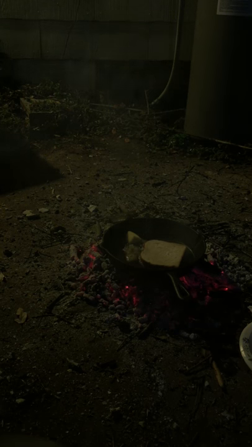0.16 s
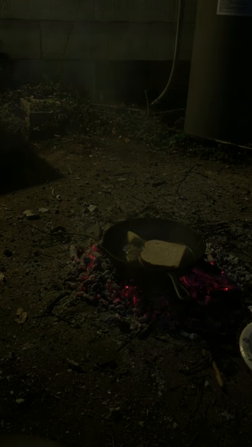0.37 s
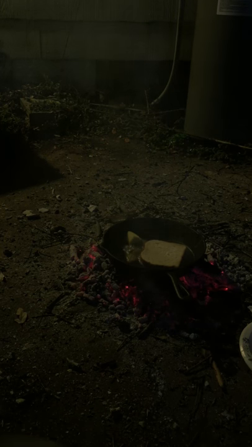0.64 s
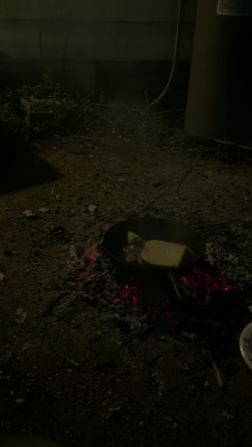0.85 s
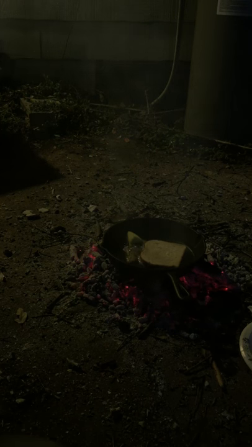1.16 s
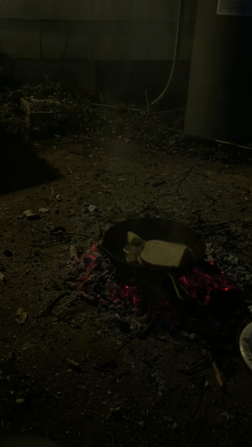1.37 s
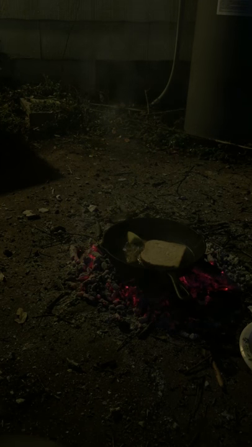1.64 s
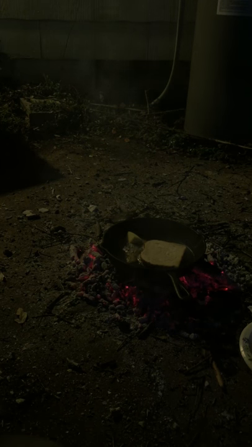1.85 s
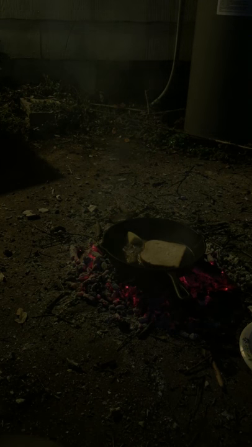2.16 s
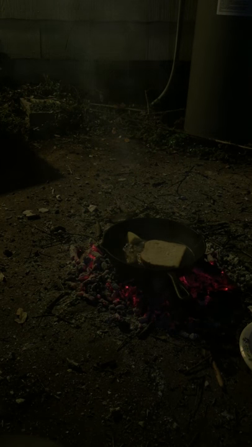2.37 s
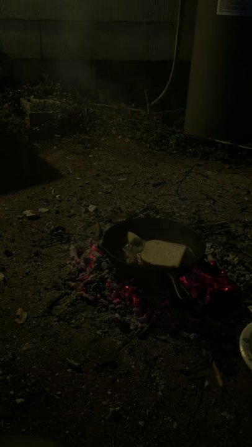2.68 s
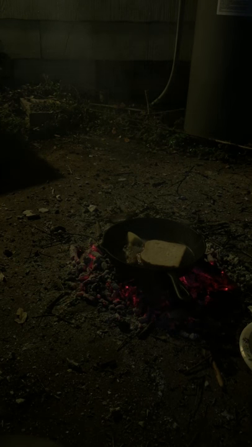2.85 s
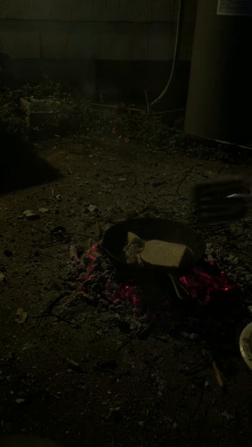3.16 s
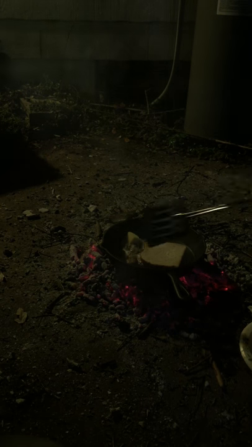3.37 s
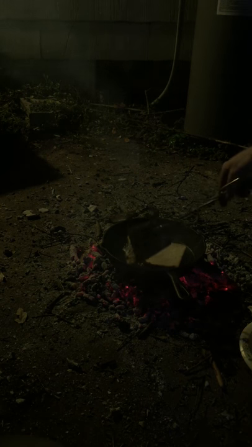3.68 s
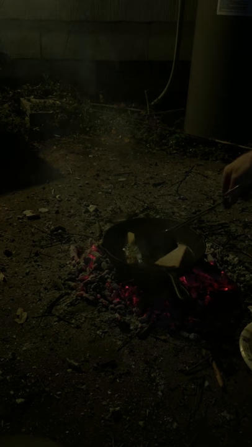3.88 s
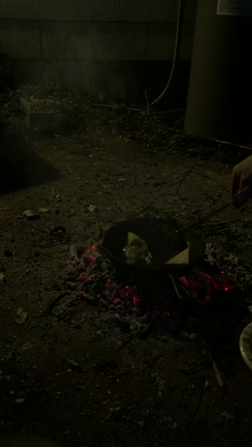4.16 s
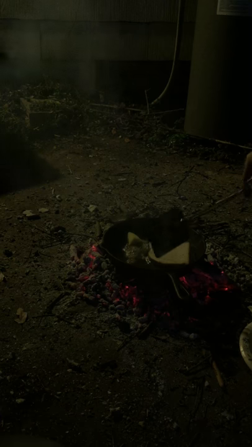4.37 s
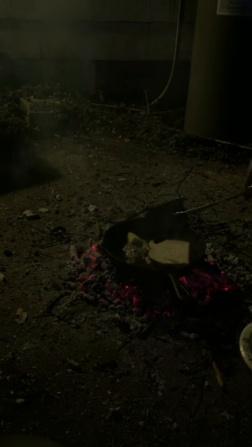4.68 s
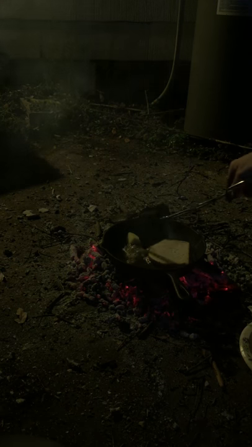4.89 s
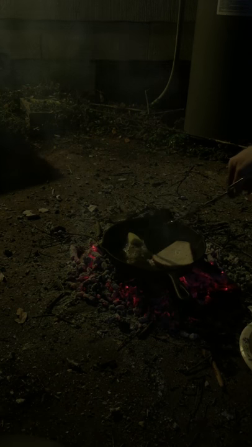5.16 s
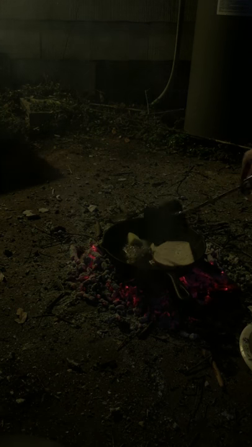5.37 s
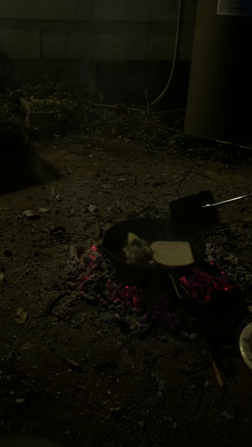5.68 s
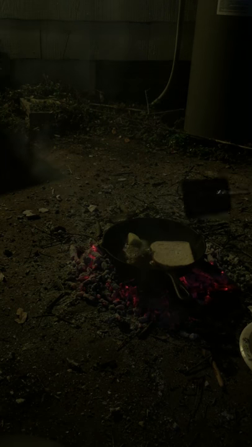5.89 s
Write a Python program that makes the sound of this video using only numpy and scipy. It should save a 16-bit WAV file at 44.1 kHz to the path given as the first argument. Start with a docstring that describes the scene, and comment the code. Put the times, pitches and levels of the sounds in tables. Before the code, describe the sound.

Outdoors at night, a soft sizzle of butter and bread comes from a nearby pan, with bubbles popping and embers snapping now and then over a low, wavering hum. Soles shuffle on gritty ground, and a thin metal spatula is lifted with a bright, rattling clink. The frying turns a little thinner, the spatula taps the pan and scrapes twice, and the sizzle carries on with hardly any echo.

```python
"""Butter and bread fry gently in a pan on embers, outdoors at night over a low hum.
From the start, tiny bubbles burst in the fat; embers and small stones snap now and then.
Until about 3.3 s, shoes scuff and crunch the gritty ground. At 2.7 s a metal spatula is
picked up with a clink; from 3 s the frying sounds thinner. At 3.9 s the spatula knocks
on the pan and slides twice under the bread, rasping and ringing. The frying goes on."""
import sys
import numpy as np
from scipy import signal
from scipy.fft import rfft, irfft, next_fast_len
from scipy.io import wavfile
from scipy.ndimage import uniform_filter1d

SR = 44100
rng = np.random.default_rng(int(sys.argv[2]) if len(sys.argv) > 2 else 0)


def wav_out(sig):
    """Save sig, one row per channel (or a flat mono array), as 16-bit PCM at SR to the path in sys.argv[1]."""
    wavfile.write(sys.argv[1], SR, np.round(np.clip(np.atleast_2d(sig).T, -1, 1) * 32767).astype(np.int16))


N = 265923
TIME_S = np.arange(N) / SR

# How hard the fat boils. Each row: time in seconds, level in dB.
BOIL_LEVEL = [(0, -57), (.15, -53), (.44, -55), (.66, -59.5), (.85, -55), (1.15, -53.5), (1.3, -48.5),
              (1.52, -58), (1.8, -55.5), (2.2, -51.5), (2.6, -55.5), (2.9, -49.5), (3.03, -53), (3.33, -53),
              (3.5, -56.5), (3.9, -54), (4.1, -62.5), (4.4, -59), (4.62, -56), (4.95, -60), (5.2, -56),
              (5.55, -53.5), (5.8, -55.5), (6.03, -56)]
# Spectrum of the fine frying. Each row: frequency in Hz, relative level in dB.
FRY_SPECTRUM = [(900, -28), (2000, -2), (3600, -1.5), (4600, 5.5), (5700, -7.5), (7200, -0.5),
                (8050, -11.5), (8900, 2.5), (9700, -3.5), (10350, -20), (11400, -1), (13000, -9),
                (14500, -10.5), (15700, -10)]
# The highest hiss against the rest of the frying. Each row: time in seconds, gain in dB.
TOP_HISS_GAIN = [(0, 2), (.35, 2.5), (.55, -8), (1.0, -2), (1.7, 3.5), (2.55, -7), (3.0, -1.5), (3.7, -9),
                 (4.3, 4), (5.25, -4), (5.5, 7), (6.03, 2.5)]
# Loudest bubbles. Each row: time in seconds, relative level in dB, pitch in Hz, t60 in seconds.
BIG_BUBBLES = [(.1105, -34, 9900, .0015), (.1225, -31.5, 9300, .003), (0.2422, -33, 4400, 0.0037),
               (.2725, -29, 11000, .001), (.4219, -30, 8900, 0.0017), (0.454, -31, 7300, 0.0022),
               (.5746, -35, 8990, .003), (.4703, -21, 8960, 0.0027), (.7006, -30.5, 11700, 0.0012),
               (.7411, -33, 8860, 0.0085), (0.8387, -22.5, 6800, 0.00097), (0.9268, -20, 8640, .00092),
               (.963, -25, 8700, 0.00055), (1.003, -25, 9200, .002), (1.0229, -25, 8800, 0.0023),
               (1.0273, -27.5, 6140, 0.003), (1.0585, -25, 7800, 0.00088), (1.0705, -22.5, 11100, .0005),
               (1.081, -27, 12000, .0006), (1.204, -24, 7900, .0008), (1.2172, -29, 8700, 0.0016),
               (1.2514, -29, 11800, .0015), (1.2867, -17.5, 7000, .0021), (1.2978, -32, 8500, .001),
               (1.415, -31, 10600, 0.00083), (1.4489, -27, 12000, .001), (1.5743, -26, 12700, 0.00081),
               (1.7944, -22.5, 7250, 0.0015), (2.012, -27, 7400, .001), (2.0196, -23, 8500, 0.0011),
               (2.11, -27.5, 6800, 0.0032), (2.1455, -23.5, 7950, .0012), (2.151, -25, 8900, 0.00091),
               (2.158, -29, 6800, 0.0012), (2.1807, -24.5, 7400, 0.00078), (2.185, -32, 8400, 0.0011),
               (2.2351, -30, 7750, 0.0013), (2.241, -29.5, 6950, 0.0044), (2.3176, -17, 7240, 0.00042),
               (2.3398, -28, 12600, 0.00093), (2.3607, -32, 5240, .0015), (2.408, -28.5, 12000, 0.0014),
               (2.4543, -22.5, 8100, 0.00044), (2.5533, -27.5, 7600, 0.0018),
               (2.7697, -28.5, 7600, 0.00082), (2.8291, -25, 7600, 0.0022), (2.876, -26.5, 6500, 0.0036),
               (2.9465, -27, 10500, .0013), (2.9964, -26, 11800, .0013), (3.0420, -28, 9200, .003),
               (3.1135, -24.5, 9500, .0013), (3.145, -30, 8900, .001), (3.1966, -27.5, 8960, 0.0077),
               (3.2872, -31, 6000, .001), (3.2904, -31, 5230, 0.0019), (3.2941, -24, 8750, 0.0028),
               (3.3282, -27, 6400, .0018), (3.3413, -28, 9000, 0.0029), (3.3977, -29, 8800, 0.0056),
               (3.4128, -31.5, 5000, 0.0027), (3.5397, -31, 10200, 0.00052), (3.543, -26, 9200, 0.00039),
               (3.6493, -31, 4850, 0.0031), (3.4905, -33, 9180, 0.0013), (3.5706, -32, 6340, 0.0017),
               (3.6942, -36, 10900, .0012), (3.868, -27.5, 7300, 0.0027), (4.028, -34.5, 7140, .002),
               (4.3179, -31.5, 11600, .0007), (4.3224, -30.5, 8900, 0.0021), (4.5538, -30.5, 7500, 0.0017),
               (4.5735, -29.5, 8250, 0.00091), (4.688, -29.5, 8100, 0.0022), (4.8475, -35, 7400, .002),
               (4.8889, -37, 11300, .0012), (4.9268, -32, 11200, .0012), (4.9635, -33, 11200, 0.00087),
               (5.0732, -26, 10500, .0012), (5.083, -20.5, 11500, 0.0019), (5.1575, -26, 14600, .00069),
               (5.2435, -33, 9920, .0015), (5.2612, -33, 6700, 0.0039), (5.3927, -39.5, 10200, .002),
               (5.4267, -33, 7330, 0.001), (5.5, -32.5, 9670, 0.0011), (5.4442, -29.5, 11300, 0.0012),
               (5.574, -27, 9100, .0025), (5.6832, -32, 12000, .001), (5.7711, -22, 7300, 0.0022),
               (5.839, -23.5, 9000, 0.00055), (5.8726, -31, 12100, 0.00044)]
# Runs of bubbles. Each row: start and length in seconds, relative level in dB, centre pitch in Hz.
BUBBLE_RUNS = [(3.012, .07, -32, 9800), (3.112, .045, -33, 9100), (3.72, .05, -35.5, 9960),
               (4.261, .045, -37.5, 8850), (4.409, .05, -38.5, 9400), (4.633, .052, -35, 9100),
               (4.83, .08, -43, 9300)]
# Embers and stones. Each row: time in seconds, relative level in dB, centre in Hz, t60 in seconds.
EMBER_SNAPS = [(0.544, -36.5, 3730, 0.011), (0.926, -45, 1650, 0.011), (.968, -47, 1620, 0.035),
               (1.343, -34, 2600, .006), (1.35, -32, 800, .02), (1.489, -45.5, 2900, 0.011),
               (1.512, -44, 3100, .008), (1.81, -38, 2250, .01), (1.827, -27.5, 2700, 0.011),
               (1.829, -34, 1200, .014), (1.8335, -33, 2000, .008), (1.937, -26, 3200, 0.0064),
               (1.9367, -26, 1600, 0.0084), (2.021, -31, 2770, 0.021), (2.0225, -27, 510, 0.02),
               (2.159, -32, 2580, .008), (2.197, -37, 2330, 0.0067), (2.261, -35.5, 2500, 0.006),
               (2.2625, -43, 1000, .008), (2.793, -38, 2600, .012), (3.539, -43, 2580, 0.0074),
               (4.826, -40, 4120, 0.014), (4.896, -40, 3600, 0.0079), (5.082, -34.5, 2170, 0.005),
               (5.261, -36.5, 2090, 0.0063)]
# Pan modes. Each row: frequency in Hz, scraped and knocked weights in dB, undamped t60 in seconds.
PAN_MODES = [(592, -22, -3, 0.067), (735, -18, -7.5, 0.091), (860, -9, -17, 0.091), (1362, -8, 1, 0.12),
             (1426, -9, -10, 0.22), (1596, -7, -9, 0.11), (1930, -12, -20, .1), (2080, -3, -5, .08),
             (2141, 2, -4, 0.23), (2300, -14, -31, 0.07), (2429, -1.5, -27, 0.19), (2626, -4, -21, 0.2),
             (2666, -12, -27, .15), (3170, -11, -32, 0.15), (3600, -4, -22, .095), (3798, -6, -24, .12),
             (4310, -7.5, -20, 0.12), (4500, -3, -24, .04), (6045, -12, -33, 0.05), (6767, -10, -30, 0.05),
             (7350, -11, -34, .05)]
# Blade strokes on the pan. Each row: peak time, rise and fall in seconds, ring and hiss weights in dB.
BLADE_STROKES = [(3.934, 0.02, .0063, -46, -47), (3.963, 0.013, 0.016, -38, -44.5),
                 (3.995, 0.0087, 0.01, -46, -43), (4.146, 0.015, 0.016, -45, -56),
                 (4.179, 0.0059, 0.0098, -48.5, -52.5), (4.22, 0.022, 0.021, -59, -61)]
# Spatula modes. Each row: frequency in Hz, weight in dB, t60 in seconds.
BLADE_MODES = [(886, 0, 0.077), (1424, -2.5, 0.095), (1587, -1, 0.067), (2013, 3, 0.13), (2140, 4.5, .11),
               (2380, 4, 0.067), (2448, 0, 0.12), (2730, 9, 0.045), (3876, -4, .12), (4140, 2, 0.06),
               (4530, -4, .095), (5330, 0, .06), (6140, 0.5, 0.13), (7068, 2, 0.12), (7671, 6, 0.067),
               (8200, 8, 0.095), (8870, 7, 0.1), (9570, 2, .11), (11200, 7, .07), (12020, 6, .08),
               (12220, 5, .09), (12700, 9, 0.075), (13470, 1, .08), (15400, 2, .06)]
# Contacts of the blade as it is lifted. Each row: time in seconds, relative level in dB.
BLADE_CONTACTS = [(2.713, 1), (2.716, -6), (2.719, -11), (2.7245, -6)]
# Shoe scuffs. Each row: peak time, rise and fall in seconds, rub weight in dB, rub centre in Hz,
# grit weight in dB, grit centre in Hz, grit width in octaves.
SHOE_SCUFFS = [(.3, .22, 0.18, -64.5, 477, -71, 2600, .8),
               (1.07, 0.022, 0.018, -47.5, 333, -54.5, 1770, 0.84),
               (1.23, 0.046, 0.045, -53.5, 320, -50.5, 1600, 2),
               (1.3, 0.026, 0.03, -46.5, 433, -51.5, 1200, 1.6),
               (1.349, 0.02, 0.023, -42.5, 570, -47.5, 1200, 2.7),
               (1.405, 0.04, 0.045, -52.5, 370, -50.5, 1200, 1.2),
               (1.8, 0.035, 0.055, -60, 300, -47, 1730, 0.87),
               (1.885, 0.03, 0.052, -45.5, 370, -48.5, 1330, 0.98),
               (1.955, 0.035, 0.053, -47, 370, -45.5, 1610, 0.97),
               (2.019, 0.024, 0.023, -39, 375, -40, 1620, 1.5),
               (2.056, 0.026, 0.028, -49, 380, -50.5, 970, 1.8),
               (2.14, .02, 0.051, -62, 420, -74, 1100, 1.2), (2.48, 0.064, 0.073, -58, 476, -62, 1500, 1.1),
               (2.82, 0.03, 0.02, -57.5, 500, -50.5, 2160, 1.2),
               (2.872, 0.016, 0.026, -50.5, 456, -50, 1640, 1.1),
               (2.925, 0.031, 0.023, -52, 563, -51, 1100, 0.71),
               (3.2, 0.091, 0.11, -65, 405, -74, 1200, 1.1)]
# A sole dragged over gritty earth. Each row: frequency in Hz, relative level in dB.
EARTH_SPECTRUM = [(90, 1), (270, 4), (370, 3), (520, -2.5), (850, 1), (1300, 0.5), (1700, -5.5), (2600, -2),
                  (4000, -2.5), (6000, -6.5), (15000, -1)]
# Loose grit under a sole. Each row: peak time, rise and fall in seconds, level in dB, centre in Hz.
GRIT_CRUNCHES = [(1.35, 0.01, 0.024, -50, 1300), (1.88, 0.043, 0.043, -50.5, 1410),
                 (2.023, .012, .012, -46, 2000), (2.16, 0.073, 0.14, -61, 1120),
                 (2.88, 0.019, 0.03, -58, 2620)]
# Light slides of a sole. Each row: peak time, rise and fall in seconds, level in dB, centre in Hz.
SOLE_SCRAPES = [(.09, 0.021, .03, -66, 3230), (.18, .055, 0.065, -61, 1950), (.29, 0.043, .05, -64.5, 2550),
                (2.43, 0.017, .035, -59, 1920)]
# Hollow sole modes. Each row: frequency in Hz, weight in dB, t60 in seconds.
SOLE_MODES = [(285, -10, 0.034), (373, -2.5, 0.028), (524, -8, 0.036), (660, 1, 0.019), (740, -7, 0.024),
              (1630, -17, .03), (2320, -5, 0.023), (2720, -11, .023)]
# Night air. Each row: frequency in Hz, relative level in dB.
NIGHT_SPECTRUM = [(20, -28.5), (32, -23), (44, -2), (68, -2), (100, 1), (125, -6.5), (155, -9.5),
                  (210, -19), (380, -24), (540, -27.5), (950, -24.5), (1400, -31.5), (3000, -33.5),
                  (15000, -41)]


def sizzle(count=2400, centre_hz=9600, spread_octaves=0.57, spread_db=6.5, min_t60_s=0.0013):
    """Hundreds of small bubbles a second, in flurries, over a fizz of finer ones."""
    crackle = np.zeros(N)
    pitches_hz = np.minimum(centre_hz * 2 ** (spread_octaves * rng.standard_normal(count)), SR / 2)
    for hz, (when, length, size) in zip(pitches_hz, rng.random((count, 3))):
        db = min(-spread_db * np.log(1 - size), 17.5)  # many faint, few loud
        sharpness = min(hz / centre_hz, 1)  # wide, low bubbles burst more softly
        t60_s = min_t60_s * (1 + 2 * length ** 2)
        add(crackle, when * N / SR, sharpness * undb(db) * bubble(hz, t60_s))
    fizz = colour(grains(7000, 6.0), FRY_SPECTRUM)
    fat = undb(-2) * colour(crackle, FRY_SPECTRUM) + undb(-6) * fizz
    fat = wander(flare_top(thin_middle(fat)), depth_db=1.5, rate_hz=14)
    flurry_db = 2 * walk(45)
    return fat * undb(level_db(BOIL_LEVEL) + flurry_db)


def thin_middle(x, start_s=2.96, over_s=0.6, band_hz=(2800, 4600), gain_db=-3):
    """The middle of the hiss sinks from about 3 s, so the frying sounds thinner."""
    middle = signal.sosfiltfilt(signal.butter(2, band_hz, "band", fs=SR, output="sos"), x)
    progress = np.clip((TIME_S - start_s) / over_s, 0, 1)
    return x + middle * (undb(gain_db * progress) - 1)


def flare_top(x, above_hz=10800):
    """The highest hiss flares and ebbs."""
    top = signal.sosfiltfilt(signal.butter(4, above_hz, "high", fs=SR, output="sos"), x)
    return x + top * (undb(level_db(TOP_HISS_GAIN)) - 1)


def pops(gain_db=-0.5, lead_in_db=-25, lead_in_s=0.011, spray_db=-23, spray_t60_s=0.012):
    """A faint fizz swells, then a large bubble bursts and flings spray, all coloured by its size."""
    out = np.zeros(N)
    lead_in = undb(lead_in_db) * fade(lead_in_s)[::-1]
    lead = len(lead_in)
    fizz_envelope = np.concatenate([lead_in, undb(spray_db) * fade(spray_t60_s), np.zeros(SR // 50)])
    fizz = colour(grains(3600, 2.9), FRY_SPECTRUM)
    for at_s, db, hz, t60_s in BIG_BUBBLES + spits():
        offset = rng.integers(N // 2)
        sound = fizz_envelope * fizz[offset:offset + len(fizz_envelope)]
        burst = bubble(hz, t60_s)[:len(sound) - lead]
        sound[lead:lead + len(burst)] += burst
        add(out, at_s - lead / SR, undb(db + gain_db) * band(sound, *edges_hz(hz, octaves=2.66)))
    return out


def spits(bubbles_per_s=85, spread_db=1, spread_octaves=0.21, median_t60_s=0.0018):
    """The butter spits short runs of bubbles; returns rows like BIG_BUBBLES."""
    rows = []
    for start_s, length_s, db, hz in BUBBLE_RUNS:
        for at_s in np.arange(start_s, start_s + length_s, 1 / bubbles_per_s):
            late, size, pitch, ringing = np.clip(rng.standard_normal(4), -1.5, 1.5)
            rows.append((at_s + late / 2 / bubbles_per_s, db + spread_db * size,
                         hz * 2 ** (spread_octaves * pitch), median_t60_s * np.exp(ringing / 2)))
    return rows


def bubble(hz, t60_s, opening_s=0.0001):
    """A bursting bubble's cavity opens smoothly and rings briefly."""
    decay = fade(max(t60_s, .0005))
    t = TIME_S[:len(decay)]
    envelope = decay * (1 - np.exp(-(t / opening_s) ** 2))
    return envelope / envelope.max() * np.sin(2 * np.pi * hz * t)


def snaps(gain_db=-3):
    """Embers and small stones crack: brief, broad, lower than the bubbles."""
    out = np.zeros(N)
    for at_s, db, hz, t60_s in EMBER_SNAPS:
        noise = unit(band(rng.standard_normal(SR // 10), hz / 1.26, hz * 1.2))
        decay = fade(t60_s)
        crack = np.pad(noise[:len(decay)] * decay, (0, SR // 100))
        add(out, at_s, undb(db + gain_db) * band(crack, hz / 2, hz * 2))
    return out


def spatula_lifted(ring_db=-44, rattle_db=-33, rattle_t60_s=0.085, low_cut_hz=720):
    """The thin blade chatters and rings as it is picked up; too small to give bass."""
    tone, rattle_power = np.zeros(N), np.zeros(N)
    add(tone, BLADE_CONTACTS[0][0], undb(ring_db) * ring(BLADE_MODES))
    for at_s, db in BLADE_CONTACTS:
        add(rattle_power, at_s, (undb(db + rattle_db) * fade(rattle_t60_s)) ** 2)
    chatter = np.sqrt(rattle_power) * unit(band(grains(14000, 2.0), 1800, 17000))
    return signal.sosfilt(signal.butter(4, low_cut_hz, "high", fs=SR, output="sos"), tone + chatter)


def spatula_in_pan(tick_s=3.9032, knock_s=3.906, detune=0.0023, judder_db=2.5):
    """The blade ticks and knocks on the pan, then stick-slip strokes rasp and drive its modes."""
    hz, scraped_db, knocked_db, t60_s = np.transpose(PAN_MODES)
    tick, knock = np.zeros(N), np.zeros(N)
    add(tick, tick_s, undb(-27) * bubble(hz=9300, t60_s=0.0025))
    add(knock, knock_s, undb(-26) * ring(zip(hz, knocked_db, t60_s), damping=1.1))
    judder = unit(undb(judder_db * walk(220)))
    slips = grains(2500, 2.1) * judder
    ringing = np.zeros(N)
    for stroke in BLADE_STROKES:  # each loads the pan at another spot, shifting its modes
        loaded_hz = hz * (1 + detune * rng.standard_normal(len(hz)))
        pan = ring(zip(loaded_hz, scraped_db, t60_s), damping=2.5)  # the blade damps the pan
        ringing += drive(slips * swells([stroke])[0], pan)
    pressure, hiss_level = swells(BLADE_STROKES)
    rasp = pressure * judder * unit(band(grains(2300, 4.0), 1600, 4000))
    hiss = hiss_level * unit(band(slips, 760, 13500))
    return tick + band(knock, 1290, 6400) + undb(-1) * ringing + undb(-6.5) * rasp + hiss


def scuffs(rub_gain_db=-1, grit_gain_db=-2, rub_octaves=0.96, crunch_db=2, judder_db=1.9):
    """Soles drag unevenly over the earth: a dull rub under brighter grit."""
    rub = band(colour(grains(5000, 2.1), EARTH_SPECTRUM), 103, 1190)
    grit = band(colour(grains(4500, 2.7), EARTH_SPECTRUM), 620, 11000) * undb(crunch_db * walk(160))
    out = np.zeros(N)
    for at_s, rise_s, fall_s, rub_db, rub_hz, grit_db, grit_hz, grit_octaves in SHOE_SCUFFS:
        stroke = (at_s, rise_s, fall_s, rub_db + rub_gain_db, grit_db + grit_gain_db)
        rub_level, grit_level = swells([stroke], roundness=1.75)
        out += rub_level * resonance(rub, rub_hz, rub_octaves)
        out += grit_level * resonance(grit, grit_hz, grit_octaves)
        rub, grit = np.roll(rub, SR // 3), np.roll(grit, SR // 3)  # fresh ground for each stroke
    return wander(out, depth_db=2, rate_hz=29.92) * undb(judder_db * walk(90))


def crunches():
    """Coarse grains crack one by one under the weight, then settle."""
    return grit_strokes(GRIT_CRUNCHES, grains_per_s=520, spread_db=3.0, octaves=1.77)


def scrapes():
    """Fine grit under a light sole sings in one narrow band."""
    return grit_strokes(SOLE_SCRAPES, grains_per_s=4000, spread_db=2.5, octaves=0.33)


def grit_strokes(rows, grains_per_s, spread_db, octaves):
    """One swell of band-passed grain impacts per row."""
    out = np.zeros(N)
    for *stroke, hz in rows:
        grit = unit(band(grains(grains_per_s, spread_db), *edges_hz(hz, octaves)))
        out += swells([stroke])[0] * grit
    return out


def tock(at_s=1.612, gain_db=-50, contact_s=0.024):
    """A shoe is set down: the soft, drawn-out contact sounds the hollow sole."""
    push = np.exp(-np.minimum(((TIME_S - at_s) / contact_s) ** 2, 20)) * grains(5900, 0.94)
    return undb(gain_db) * drive(push, ring(SOLE_MODES))


def night(air_db=-54, hum_db=-62, hum_hz=69, drift_hz=2.55, waver_db=3):
    """A distant low rumble with a wavering hum."""
    air = wander(colour(rng.standard_normal(N), NIGHT_SPECTRUM), depth_db=3, rate_hz=11)
    phase = 2 * np.pi * np.cumsum(hum_hz + drift_hz * walk(6.5)) / SR
    hum = unit(np.sin(phase) * undb(waver_db * walk(10)))
    return undb(air_db) * air + undb(hum_db) * hum


def yard(x, echo_db, tail_db, tail_t60_s=.05, echo_lags_s=(.0004, .0041, .0082)):
    """Quick echoes off the pan's wall and the ground, plus a short scatter from the yard."""
    decay = fade(tail_t60_s)
    response = np.concatenate([np.zeros(SR // 1000), rng.standard_normal(len(decay)) * decay])
    response *= undb(tail_db) / np.sqrt(np.sum(response ** 2))
    response[0] = 1
    for lag_s in echo_lags_s:
        response[int(lag_s * SR)] += undb(echo_db)
    return signal.fftconvolve(x, response)[:N]


def ring(modes, damping=1):
    """Impulse response of a body; damping divides each t60."""
    out = np.zeros(SR // 2)
    for hz, db, t60_s in modes:
        decay = fade(t60_s / damping)[:len(out)]
        tone = np.sin(2 * np.pi * hz * TIME_S[:len(decay)])
        out[:len(decay)] += undb(db) * decay * tone * rng.choice([-1, 1])
    return out


def drive(force, body):
    """A force sounds a body's impulse response, scaled to unit energy."""
    return signal.fftconvolve(force, body / np.sqrt(np.sum(body ** 2)))[:N]


def grains(per_s, spread_db):
    """Random tiny impacts of uneven size, rms 1."""
    hits = (rng.random(N) < per_s / SR) * rng.choice([-1, 1], N)
    return unit(hits * undb(spread_db * np.minimum(rng.exponential(size=N), 4)))


def swells(strokes, roundness=2):
    """One rise-and-fall envelope per dB column; roundness 1 gives pointed peaks."""
    power = 0
    for at_s, rise_s, fall_s, *levels_db in strokes:
        distance = abs((TIME_S - at_s) / np.where(TIME_S < at_s, rise_s, fall_s))
        power = power + undb(levels_db)[:, None] ** 2 * np.exp(-np.minimum(distance ** roundness, 20))
    return np.sqrt(power)


def walk(rate_hz):
    """Smooth random curve, rms 1."""
    hold = int(SR / rate_hz)
    steps = np.repeat(rng.standard_normal(N // hold + 1), hold)[:N]
    return unit(uniform_filter1d(uniform_filter1d(steps, hold), hold))


def wander(x, depth_db, rate_hz):
    """Each half octave from 100 Hz up swells and sinks on its own."""
    size = next_fast_len(N)
    spectrum = rfft(x, size)
    hz = np.arange(len(spectrum)) * SR / size
    half_octaves = 2 * np.log2(np.maximum(hz / 100, 1))
    bands = (irfft(spectrum * np.maximum(1 - abs(half_octaves - k), 0), size)[:N] for k in range(17))
    return sum(part * undb(depth_db * walk(rate_hz)) for part in bands)


def colour(x, points):
    """Minimum-phase filter through (Hz, dB) points, so clicks keep sharp fronts; rms 1."""
    hz, db = np.transpose(points)
    size = 2 * next_fast_len(N // 2 + SR // 4)
    bins_hz = np.maximum(np.arange(size // 2 + 1) * SR / size, 1)
    gain = undb(np.interp(np.log(bins_hz), np.log(hz), db))
    cepstrum = irfft(np.log(gain))
    cepstrum[1:size // 2] *= 2
    cepstrum[size // 2 + 1:] = 0
    return unit(irfft(rfft(x, size) * np.exp(rfft(cepstrum)))[:N])


def resonance(x, hz, octaves):
    """Broad peak with gentle skirts, rms 1."""
    return unit(band(x, *edges_hz(hz, octaves), order=1))


def band(x, lo_hz, hi_hz, order=2):
    """Gentle band-pass."""
    sos = signal.butter(order, [lo_hz, min(hi_hz, SR / 2 - 1)], "band", fs=SR, output="sos")
    return signal.sosfilt(sos, x)


def edges_hz(centre_hz, octaves):
    """Lower and upper edge of a band."""
    ratio = 2 ** (octaves / 2)
    return centre_hz / ratio, centre_hz * ratio


def fade(t60_s):
    """Exponential decay to -60 dB."""
    return np.exp(-np.log(1000) * TIME_S[:int(t60_s * SR) + 2] / t60_s)


def level_db(points):
    """Curve through (s, dB) points."""
    return np.interp(TIME_S, *np.transpose(points))


def add(out, at_s, sound):
    """Mix a sound in at a time."""
    start = max(int(at_s * SR), 0)
    part = sound[:max(N - start, 0)]
    out[start:start + len(part)] += part


def undb(db):
    """Decibels to gain."""
    return 10 ** (np.asarray(db) / 20)


def unit(x):
    """Scale to rms 1."""
    return x / np.sqrt(np.mean(x ** 2))


def scene():
    """Mono mix; the shoes, away from the pan, echo less."""
    fire = sizzle() + pops() + snaps()
    shoes = scuffs() + crunches() + scrapes() + tock()
    spatula = spatula_lifted() + spatula_in_pan()
    cooking = yard(fire + spatula, echo_db=-18, tail_db=-12)
    return (cooking + night() + yard(shoes, echo_db=-24, tail_db=-17))[None]


def record(dry):
    """Steep low-pass at 15.9 kHz."""
    return signal.sosfilt(signal.ellip(10, .2, 70, 15900, fs=SR, output="sos"), dry)


dry = scene()
out = record(dry)
wav_out(out)
```